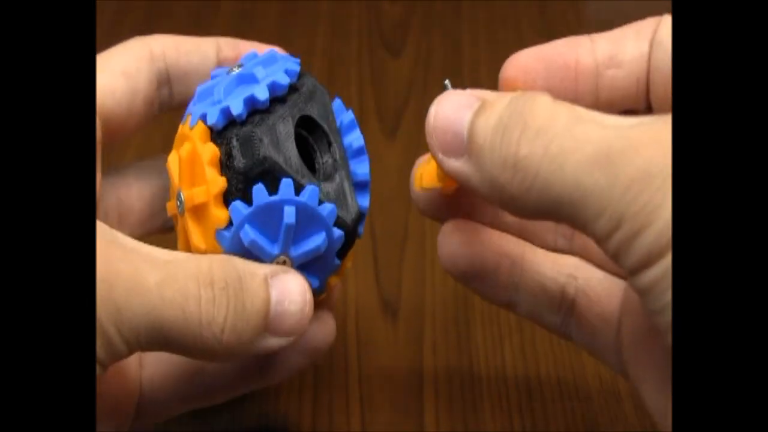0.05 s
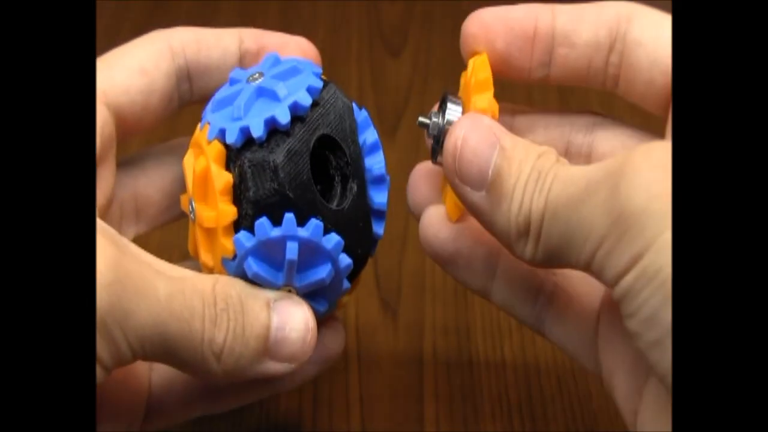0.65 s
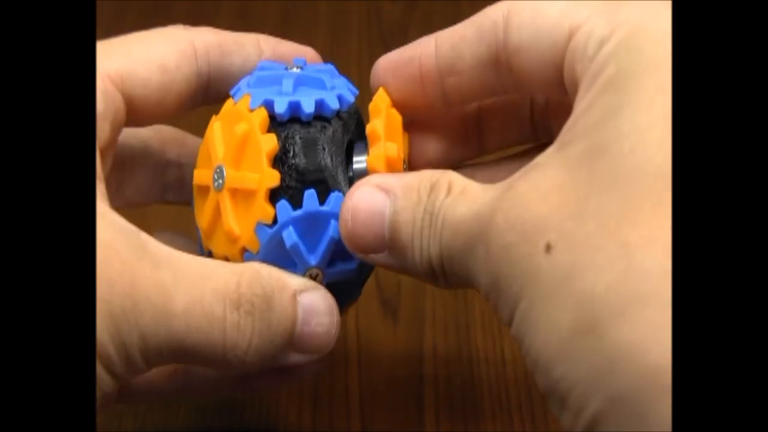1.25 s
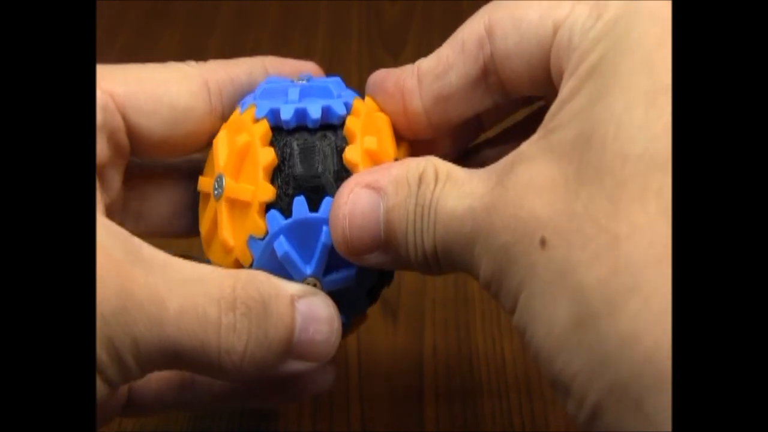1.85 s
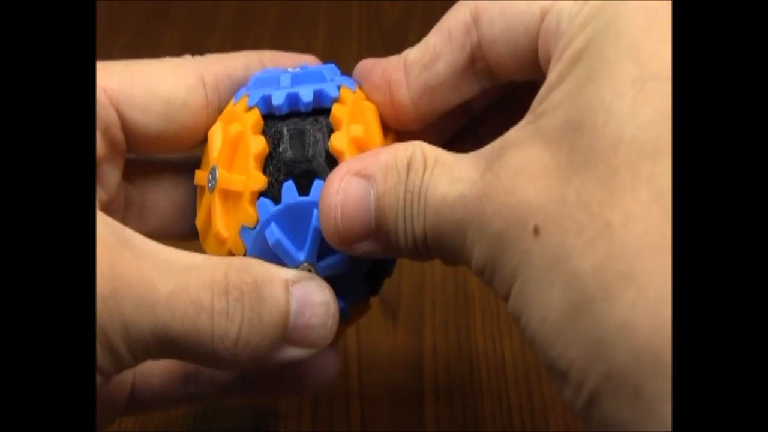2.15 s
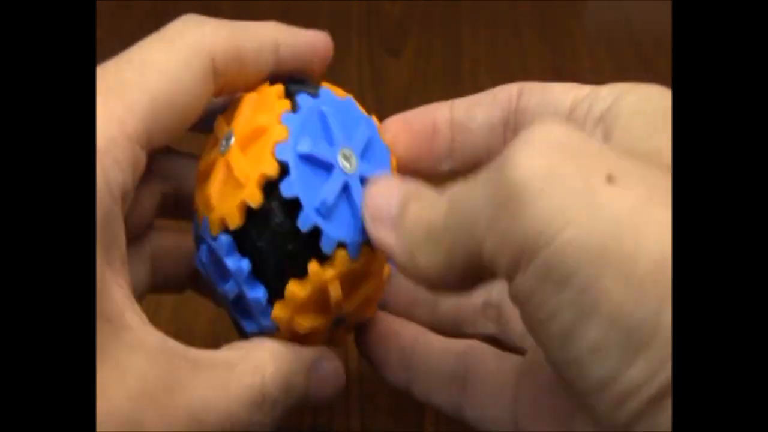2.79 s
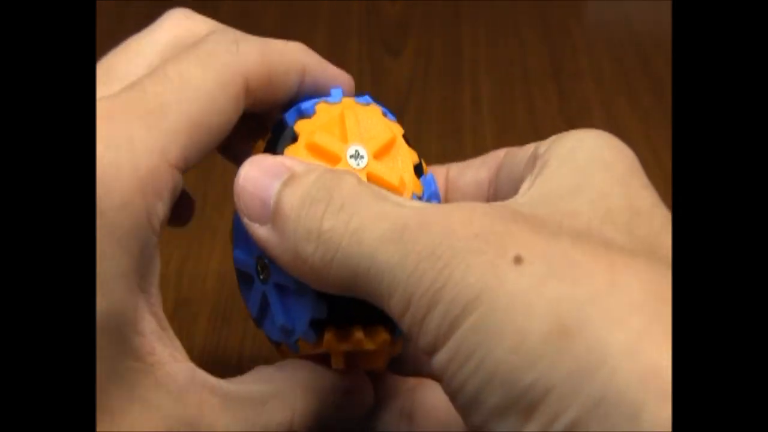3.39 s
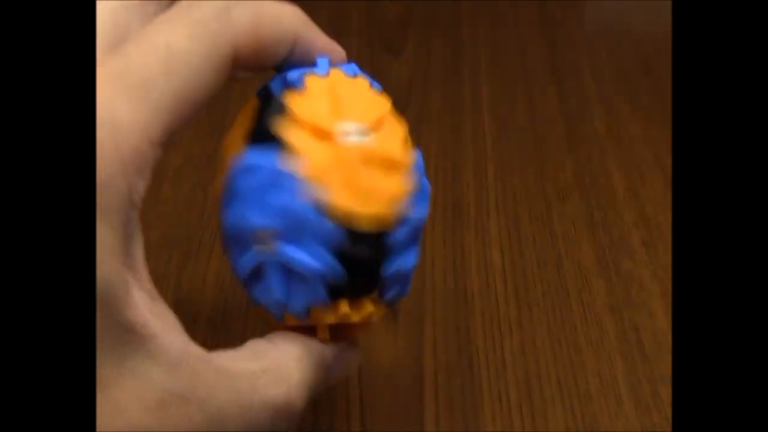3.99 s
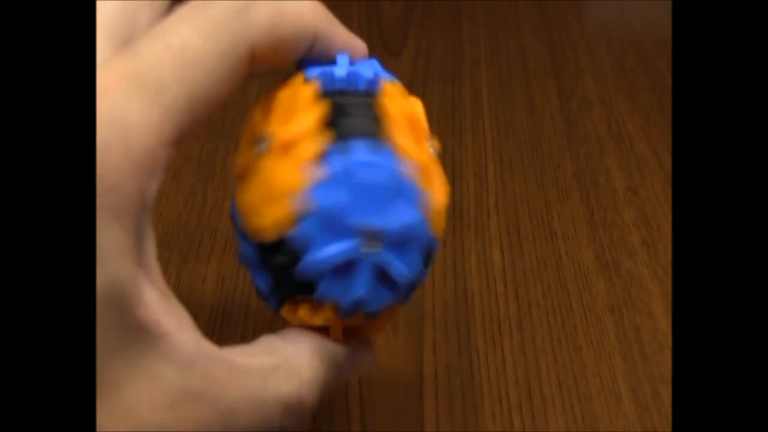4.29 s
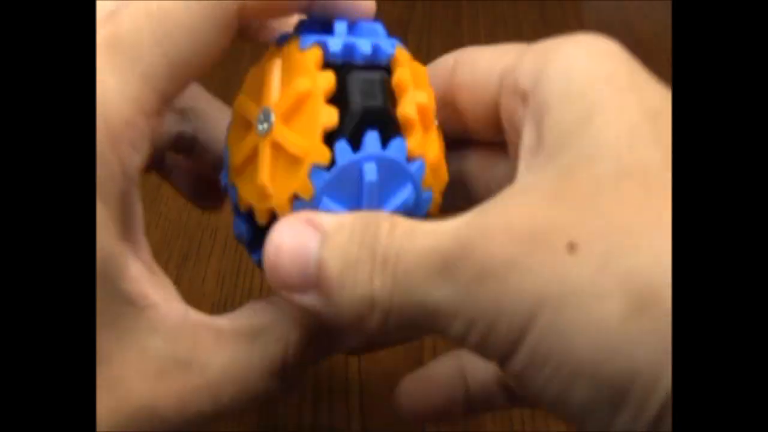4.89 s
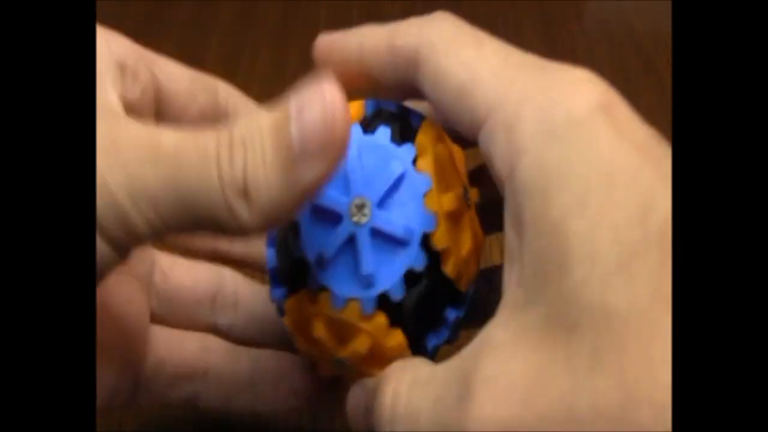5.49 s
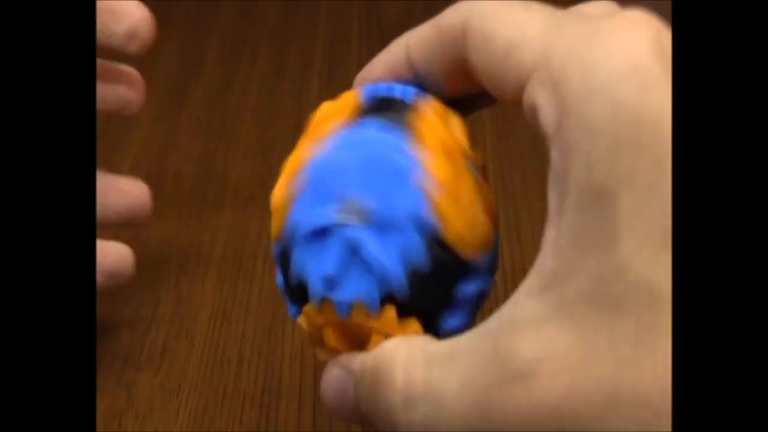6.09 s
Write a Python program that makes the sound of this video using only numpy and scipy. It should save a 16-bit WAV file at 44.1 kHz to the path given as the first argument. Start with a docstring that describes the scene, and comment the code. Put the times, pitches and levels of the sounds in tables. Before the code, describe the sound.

A plastic gear toy snaps together, ticks as it is handled, then spins with a rattling whir over a faint fan hum.

```python
"""A printed plastic gear ball is handled close by: a gear on a steel bearing is eased into its socket
and seats with a snap, the teeth tick as the ball is turned over, then it is flicked into a whirring,
rattling spin, caught, and flicked again. Impacts and friction excite the damped modes of its core, gears
and bearings. A fan hums in the small room; its sound swells slowly and dips at the snap."""
import sys
import numpy as np
from scipy import signal
from scipy.fft import rfft, irfft, next_fast_len
from scipy.io import wavfile
from scipy.ndimage import map_coordinates

SR = 44100
rng = np.random.default_rng(int(sys.argv[2]) if len(sys.argv) > 2 else 0)


def waveform_to_disk(signal):
    """Save audio, clipped to [-1, 1], as 16-bit WAV at the path in sys.argv[1]."""
    frames = np.transpose(np.atleast_2d(signal))
    scaled = np.clip(frames, -1, 1) * 32767
    samples = np.round(scaled).astype(np.int16)
    wavfile.write(sys.argv[1], SR, samples)


N = 275625
TIME = np.arange(N) / SR

# Modes of a gear disc, of tooth edges and bearings, and of the core with a hand closed round it.
# Each row: frequency in Hz, bandwidth in Hz, gain in dB.
GEAR_MODES = [(3050, 460, -1), (3994, 180, -0.5)]
EDGE_MODES = [(4660, 560, -1), (6230, 970, -1.5), (7420, 800, 2), (9840, 770, -8.5), (11550, 1300, -9)]
CUPPED_MODES = [(900, 740, -16.5), (1856, 242, 4), (2210, 380, 0.5)]
# Impacts of the bearing as it seats. Each row: start in seconds, decay time in seconds, relative dB.
SNAP_IMPACTS = [(2.1937, .003, -31), (2.1971, 0.0025, -20), (2.1987, 0.0012, -25)]


def amp(db):
    """Amplitude grows tenfold for every 20 dB."""
    return 10 ** (np.asarray(db) / 20)


def unit(x):
    """Normalisation to an rms of 1."""
    return x / np.sqrt(np.mean(x ** 2) + 1e-20)


def along(points, hz):
    """Interpolation of (Hz, value) points on a logarithmic frequency axis."""
    freqs, values = np.transpose(points)
    return np.interp(np.log(hz + 1), np.log(freqs), values)


def wobble(rate):
    """Smooth random fluctuation through `rate` knots a second."""
    return map_coordinates(rng.standard_normal(int(N * rate / SR) + 4), [TIME * rate])


def bell(offset, width):
    """A swell whose power is a Gaussian with standard deviation `width`."""
    return np.exp(-(offset / (2 * width)) ** 2)


def add(track, start_s, sound):
    """Superposition: a sound adds to the track from its start time on."""
    part = track[round(start_s * SR):][:len(sound)]
    part += sound[:len(part)]


def filtered(x, response):
    """Linear filtering: the spectrum is multiplied by a frequency response."""
    n = x.shape[-1]
    padded = next_fast_len(n + n // 8)
    return irfft(rfft(x, padded) * response(np.fft.rfftfreq(padded, 1 / SR)), padded)[..., :n]


def ring(x, modes):
    """Forced response of damped modes (Hz, bandwidth in Hz, dB) of alternating polarity."""
    return filtered(x, lambda f: sum((-1) ** k * amp(db) * 1j * f * width
                                     / (hz * hz - f * f + 1j * f * width)
                                     for k, (hz, width, db) in enumerate(modes)))


def ring_in_step(x, modes):
    """Forced response of damped modes that share one polarity."""
    return sum(ring(x, [mode]) for mode in modes)


def grains(rate, spread_db, size=N):
    """Shot noise: tiny impacts of uneven strength at random moments, `rate` a second on average."""
    hits = rng.random(size) < rate / SR
    signs = np.sign(rng.standard_normal(size))
    return hits * signs * amp(spread_db * np.clip(rng.standard_normal(size), -2, 2))


def contact(decay_s, modes):
    """Impact excitation: a dying chatter rings the modes, with the energy of 10 ms at rms 1."""
    t = np.arange(SR // 20) / SR
    envelope = np.exp(-t / max(decay_s, 1e-4)) * (1 - np.exp(-t / .0005))
    chatter = grains(rate=15000, spread_db=-2.5, size=len(t)) * envelope
    return unit(ring(chatter, modes)) / np.sqrt(len(t) / (SR // 100))


def fan_swell():
    """Exponential approach to full level, from silence and again from a dip just before the snap."""
    start_s, dip_s, time_constant_s, dip_share = .36, 2.182, 9.64, 0.036
    first = 1 - np.exp(-np.maximum(TIME - start_s, 0) / time_constant_s)
    again = 1 - (1 - dip_share) * np.exp(-(TIME - dip_s) / time_constant_s)
    return np.where(TIME < dip_s, first, again)


def fan():
    """Turbulent air gives broadband noise; the periodic motion of motor and blades gives tones."""
    # Spectrum of the air. Each row: frequency in Hz, relative spectral density in dB.
    air_spectrum = [(25, -24.5), (60, -19), (100, -13), (166, -7), (200, -10), (285, -5.5), (450, -16),
                    (520, -12.5), (730, -17), (880, -13.5), (1100, -16), (1250, -13), (1610, -18.5),
                    (14400, -41)]
    # Motor and blade tones. Each row: frequency in Hz, level in dB against the air.
    partials = [(140.4, -34), (166.3, -3), (175.8, -15), (248.5, -26.5), (280.7, -22.5), (527.6, -21.5),
                (877.5, -20), (985, -16.5), (1161.5, -18.5), (1231.7, -10), (1302, -29)]
    # Likeness of the air noise at the two ears. Each row: frequency in Hz, correlation from 0 to 1.
    coherence = [(60, 0.88), (150, 0.88), (380, 0.68), (950, 0.4), (2380, 0.67), (5980, 0.49),
                 (15000, 0.83)]

    def mid_side_response(hz):
        """The lower the coherence, the more power goes to the difference between the ears."""
        angle = np.arccos(np.clip(along(coherence, hz), -1, 1)) / 2
        return amp(along(air_spectrum, hz)) * [np.cos(angle), np.sin(angle)]

    mid, side = filtered(rng.standard_normal((2, N)), mid_side_response)
    air = unit(np.array([mid + side, mid - side]))
    rotor_time = TIME + np.cumsum(0.00089 * wobble(3.014)) / SR  # all tones waver in pitch together
    tones = sum(amp(db + 1.7 * wobble(5.6)) * np.sin(2 * np.pi * (hz * rotor_time + rng.random()))
                for hz, db in partials)
    pan_right = amp([[-1.15], [1.15]])
    return amp(-32) * fan_swell() * (air + np.sqrt(2) * tones) * pan_right


def clicks():
    """Single impacts excite the modes of core, gear and edges; the steel axle rings higher."""
    # Knocks of teeth and bearings.
    # Each row: start in seconds, decay time in seconds, relative level in dB, brightness in dB.
    knocks = [(1.193, 0.0014, -52.5, -3.5), (1.502, .003, -53.5, -3), (2.466, 0.0024, -42, 2),
              (2.659, 0.013, -48, -1.5), (2.7755, .0056, -37.5, 3.5), (2.884, 0.0019, -49.5, -6),
              (2.9826, .012, -50, -4), (3.051, 0.012, -42, -1), (3.078, 0.0031, -43.5, 3),
              (3.152, 0.0035, -39.5, -1), (3.206, 0.0036, -43, -1), (3.273, 0.0027, -47, 1.5),
              (3.708, 0.0031, -46, -0.5), (3.744, 0.0019, -48, 0), (3.787, 0.0029, -43, -2),
              (3.974, 0.0052, -27, -5), (4.547, 0.0068, -24.5, 9), (5.0334, 0.0063, -15.5, -2),
              (5.0665, 0.0097, -25.5, 0), (5.1846, .013, -34.5, -2), (5.212, .0035, -31.5, 2.5),
              (5.3033, .011, -39, -0.5), (5.401, 0.0091, -38, -2.5), (5.651, 0.0019, -29, -2),
              (5.6541, 0.0037, -32, 6.5), (5.667, 0.0068, -38, -2), (5.707, 0.005, -31, 1),
              (5.733, .008, -34, 2), (5.841, 0.0027, -46, 9), (6.052, 0.0027, -44, -1.5),
              (6.101, 0.0033, -42, -1), (6.128, 0.0063, -30, -2.5), (6.16, 0.006, -23, -3)]
    # The axle finds its hole. Each row: start in seconds, relative level in dB.
    axle_ticks = [(1.1945, -58), (1.3184, -55), (1.4331, -58), (1.5033, -44)]
    # Modes of the steel bearing. Each row: frequency in Hz, bandwidth in Hz, gain in dB.
    axle_modes = [(4820, 110, 0.5), (6300, 160, -13), (6980, 120, -7.5)]
    track = np.zeros(N)
    for start, decay, db, bright_db in knocks:
        parts = (-3.5 - bright_db, CUPPED_MODES), (-3.5, GEAR_MODES), (-2.5 + bright_db, EDGE_MODES)
        add(track, start, sum(amp(db + part_db) * contact(decay, modes) for part_db, modes in parts))
    for start, db in axle_ticks:
        add(track, start, amp(db - 2.5) * contact(0.00056, axle_modes))
    return track


def slide():
    """Sliding friction: steel rubs softly over the printed ridges of the socket."""
    # Envelope of the rub. Each row: time in seconds, level in dB.
    envelope = [(1.22, -85), (1.3, -60.5), (1.5, -61), (1.65, -61), (1.8, -85)]
    ridges = grains(rate=2000, spread_db=2)
    rub = unit(ring_in_step(ridges, [(2400, 370, -1.2), (3440, 160, -0.87)]))
    return amp(np.interp(TIME, *np.transpose(envelope), left=-np.inf, right=-np.inf)) * rub


def snap():
    """Impulse response: the bearing jumps home with a crack, the socket rings and the hands thump."""
    # Modes of the socket. Each row: frequency in Hz, bandwidth in Hz, gain in dB.
    socket_modes = [(2250, 340, 9.5), (2720, 400, -8), (3220, 250, -14), (4040, 180, 9), (5370, 190, 11),
                    (6300, 250, -3), (7150, 620, 6), (7600, 250, 1), (10400, 1500, -6), (12200, 170, 0)]
    crack_modes = [(1590, 1200, -6), (2850, 1900, -4), (7300, 1700, -1)]
    track = np.zeros(N)
    socket = unit(ring(signal.unit_impulse(SR // 100), socket_modes))
    for start, decay, db in SNAP_IMPACTS:
        add(track, start, amp(db - 2.5) * socket)
        add(track, start, amp(db - 4.0) * contact(decay, crack_modes))
    thump = unit(ring(signal.unit_impulse(SR // 25), [(75, 54, 0)]))
    add(track, 2.192, amp(-47.5) * thump)
    return track


def snap_to_walls():
    """Radiation in all directions: the snap leaves the hands smeared and a little duller."""
    modes = [(2170, 600, 1.4), (4800, 1000, -1.2), (7550, 1900, -0.38)]
    track = np.zeros(N)
    add(track, SNAP_IMPACTS[1][0], amp(-18.5) * contact(0.0033, modes))
    return track


def rolling():
    """Loose teeth collide as the fingers turn the gears, exciting gears and cupped core alike."""
    # Pushes of the fingers. Each row: centre in seconds, half-width in seconds, relative level in dB.
    nudges = [(2.73, 0.014, -48.5), (2.823, 0.015, -49.5), (3.12, 0.014, -48.5), (3.58, 0.021, -55.5),
              (3.806, 0.012, -42), (3.851, 0.0093, -20.5), (5.378, .008, -45), (5.425, 0.013, -46.5),
              (5.725, 0.015, -35.5), (5.773, 0.006, -42.5), (6.142, 0.0069, -32)]
    level = sum(amp(db) * bell(TIME - centre, width) for centre, width, db in nudges)
    ticks = grains(rate=550, spread_db=-1)
    gears = unit(ring(ticks, GEAR_MODES + EDGE_MODES))
    core = unit(ring(ticks, CUPPED_MODES))
    return level * (amp(-2) * gears + amp(-2.5) * core)


def spin_motion():
    """Friction slows the flicked ball uniformly; each passing gear modulates the amplitude."""
    # Each row is a flick: time at full speed and time of the catch in seconds, gear passes per second,
    # relative level in dB, core knock in dB, starting point in the pass and hand cupping from 0 to 1.
    flicks = np.array([(3.848, 5.02, 5.74, -18, -7, 0.97, 0.06), (6.184, 6.4, 6, -12.5, -3, 0.53, 0.55)])
    slowing_per_s2, cupping_per_s2, teeth_per_pass = 1.79, 0.61, 27
    rise_db_per_s, fade_db_per_s, brake_db_per_s = 500, 1.47, 400
    current = np.searchsorted(flicks[:-1, 1] + .5, TIME)
    start, caught, speed, db, knock_db, first_point, first_cupping = flicks[current].T
    age = TIME - start
    free_run = np.clip(age, 0, caught - start)
    passes = first_point + speed * age - slowing_per_s2 * free_run ** 2 / 2
    braking_db = brake_db_per_s * np.maximum(TIME - caught, 0)
    level = amp(db + rise_db_per_s * np.minimum(age, 0) - fade_db_per_s * free_run - braking_db)
    # In every pass the gears swell into mesh, then clash as the slack is taken up.
    mesh_point, clash_point, floor_db = 0.25, 0.6, -9.5
    mesh = bell((passes - mesh_point + .5) % 1 - .5, width=0.12)
    clash = amp(2) * bell((passes - clash_point + .5) % 1 - .5, width=0.042)
    uneven = amp(1.1 * wobble(55))  # printed teeth never mesh twice alike
    surge = np.sqrt(amp(floor_db) ** 2 + mesh ** 2 + clash ** 2) * uneven
    coast = level * surge ** 0.17  # follows only a small share of the swing in dB
    tooth_hz = teeth_per_pass * (speed - slowing_per_s2 * free_run)
    cupping = np.clip(first_cupping + cupping_per_s2 * free_run ** 2, 0, 1)  # the hand closes
    return level * surge, coast, amp(knock_db) * coast, level * clash, tooth_hz, cupping


def spin():
    """Gear noise: meshing teeth knock the core while bearings rattle. Returns mid and side signals."""
    # Rattle of bearings and teeth. Each row: frequency in Hz, relative spectral density in dB.
    rattle_spectrum = [(150, -30), (400, -25.5), (800, -8), (1500, -8.5), (2000, 8), (2550, -5),
                       (3100, -0.5), (4200, 2), (5600, -2.5), (6600, -0.5), (7900, -2), (8600, -2),
                       (10400, -7), (12000, -5.5), (15500, -18.5)]
    # Modes of the hollow core and of the loose balls in the bearings.
    # Each row: frequency in Hz, bandwidth in Hz, gain in dB.
    core_modes = [(1850, 690, -4), (2126, 75, 9), (2107, 92, 7.5), (2120, 52, -11.5)]
    ball_modes = [(7664, 106, -0.5), (6470, 220, -5)]
    drive, coast, knock_level, clash, tooth_hz, cupping = spin_motion()
    phase = np.cumsum(tooth_hz * np.exp(.16 * wobble(90))) / SR  # backlash makes the beat uneven
    teeth = np.diff(np.floor(phase), prepend=0) * amp(3 * np.clip(rng.standard_normal(N), -2, 2))
    pressure = amp(1.5 * np.cos(2 * np.pi * phase) + 1.2 * wobble(200))
    contacts = pressure * grains(rate=7000, spread_db=1.0, size=(2, N))  # spread all round the ball
    scrape, side = unit(filtered(contacts, lambda hz: amp(along(rattle_spectrum, hz))))
    chatter = unit(ring(grains(rate=1100, spread_db=7), GEAR_MODES + EDGE_MODES))
    ping = unit(ring(grains(rate=130, spread_db=4), ball_modes))
    blows = unit(teeth) + .4 * unit(grains(rate=1500, spread_db=3))
    open_core = np.sqrt(1 - cupping) * unit(ring_in_step(blows, core_modes))
    cupped_core = np.sqrt(cupping) * unit(ring(blows, CUPPED_MODES))
    snags = amp(-22) * coast * unit(ring(grains(rate=37, spread_db=2), GEAR_MODES + EDGE_MODES))
    rattle = drive * (amp(-2.5) * scrape + amp(-6.0) * chatter)
    balls = (amp(-14) * coast + amp(-15) * clash) * ping
    knocks = knock_level * amp(1.8 * wobble(50)) * (open_core + cupped_core)
    return rattle + knocks + snags + balls, amp(-17) * drive * side


def scatter(x):
    """Scattering by hands and table shifts the phase between the ears, differently at each frequency."""
    lag = np.arange(-SR // 100, SR // 100 + 1) / SR
    paths = rng.standard_normal(len(lag)) * np.exp(-np.abs(lag) / .001)
    paths = paths - paths[::-1]  # an odd response leaves both ears equally loud
    side = signal.fftconvolve(x, paths / np.linalg.norm(paths), "same")
    return np.array([side, -side])


def room(x):
    """Reverberation: wall reflections form an exponentially decaying tail, different in each ear."""
    # Each row: frequency in Hz, time in seconds to decay by 60 dB.
    reverb_times = [(200, 0.6), (2000, 0.25), (7000, 0.25), (14000, 0.26)]
    hz, t, noise = signal.stft(rng.standard_normal((2, SR // 2)), SR, nperseg=256)
    decay = amp(-60 * t / along(reverb_times, hz)[:, None])
    tail = signal.istft(noise * decay, SR, nperseg=256)[1]
    return signal.fftconvolve(x[None], tail / np.linalg.norm(tail[0]), axes=1)[:, :N]


def scene():
    """Superposition of the ball's direct, scattered and reflected sound with the fan further off."""
    whirr, whirr_side = spin()
    handling = slide() + clicks() + rolling() + whirr
    direct = handling + snap()
    width = amp(-15) * scatter(direct) + np.array([whirr_side, -whirr_side])
    reverberation = amp(-10.5) * room(handling + snap_to_walls())
    pan_left = amp([[.25], [-.25]])
    return amp(-1.2) * (direct + width + reverberation) * pan_left + fan()


def record(dry):
    """Soft saturation rounds the loudest peaks; a steep low-pass filter limits the band."""
    ceiling, cutoff_hz = .85, 15950
    rounded = dry / (1 + (dry / ceiling) ** 4) ** .25
    return filtered(rounded, lambda hz: 1 / (1 + (hz / cutoff_hz) ** 200))


dry = scene()
out = record(dry)
waveform_to_disk(out)
```